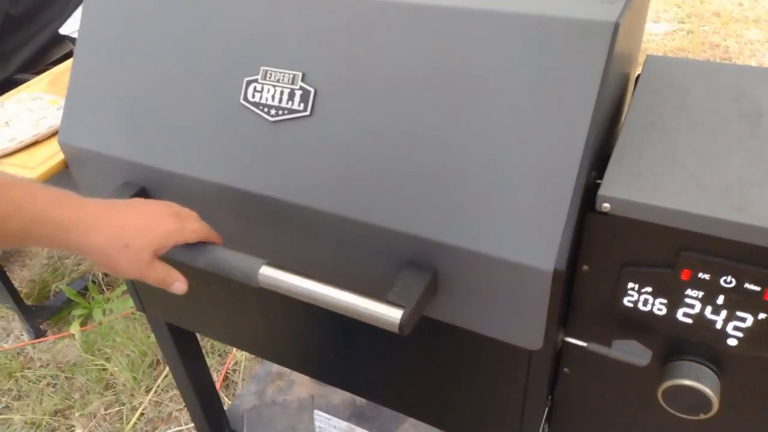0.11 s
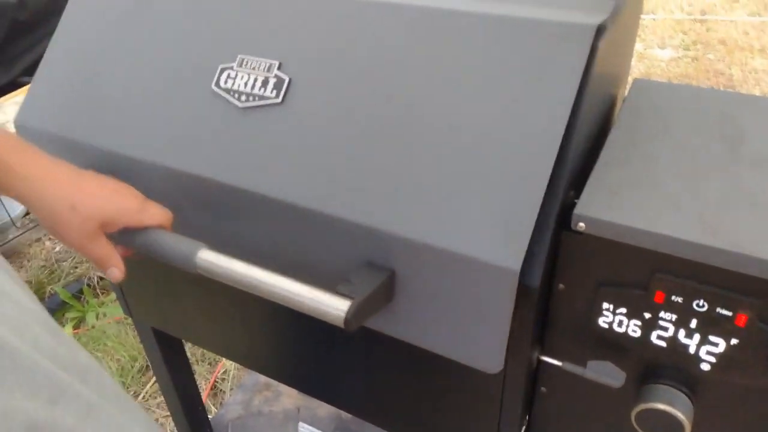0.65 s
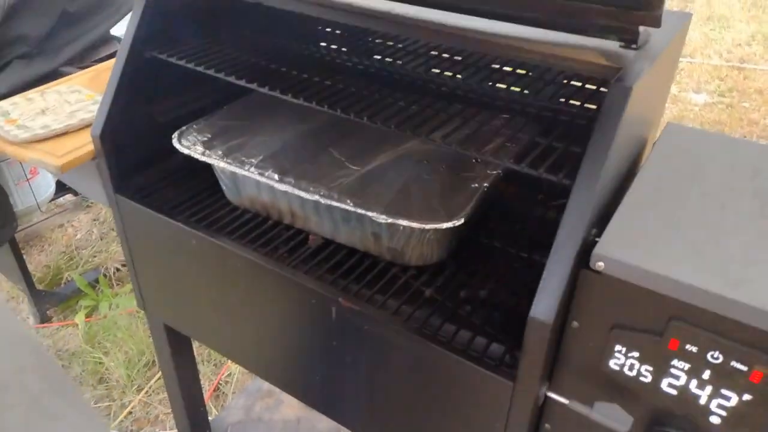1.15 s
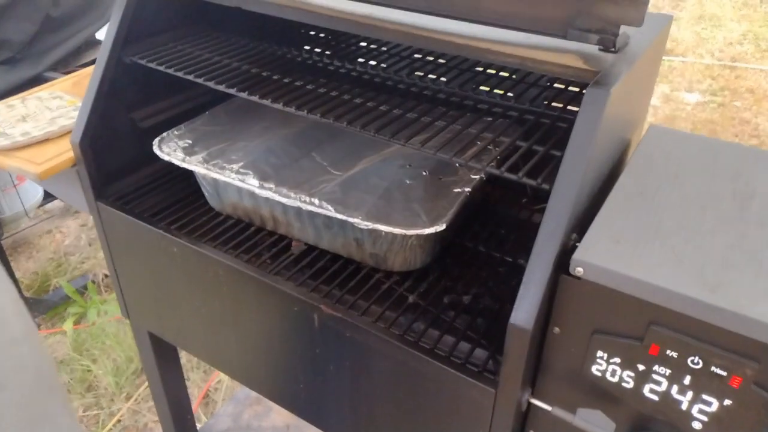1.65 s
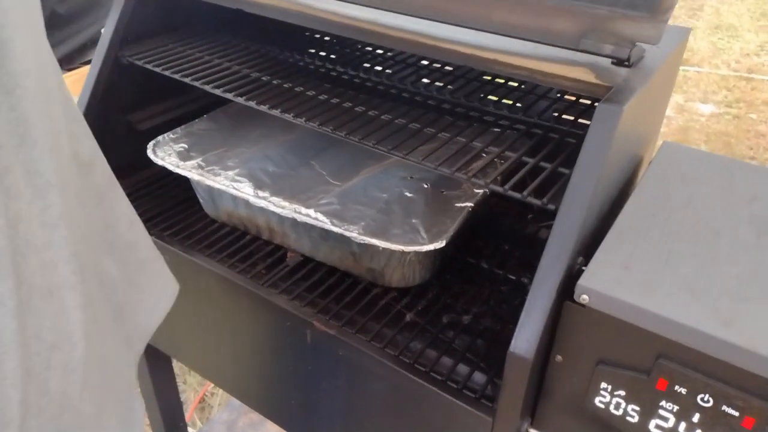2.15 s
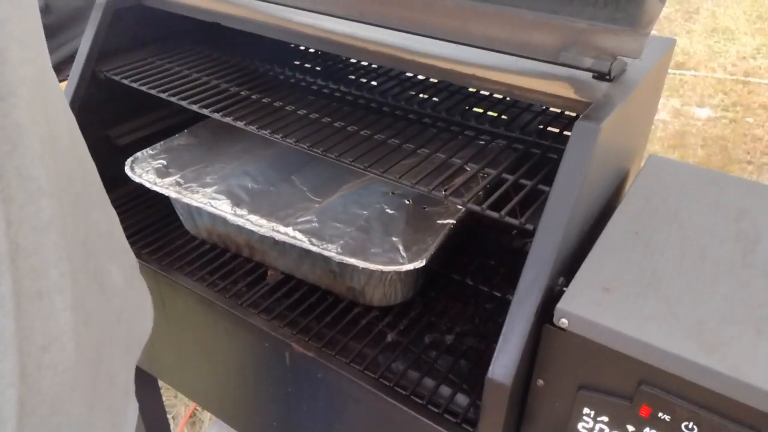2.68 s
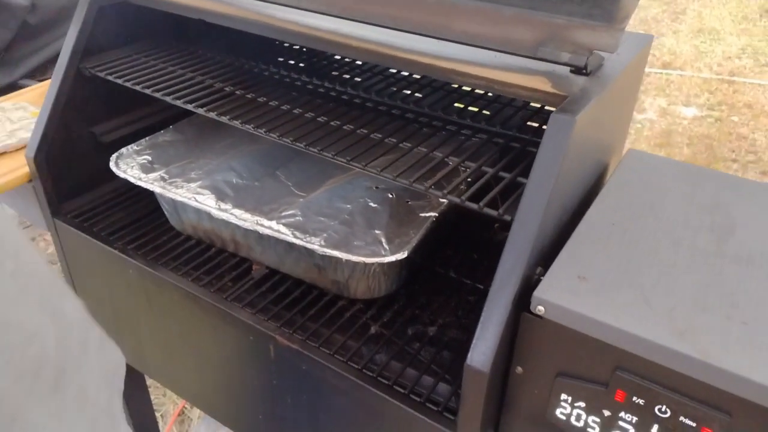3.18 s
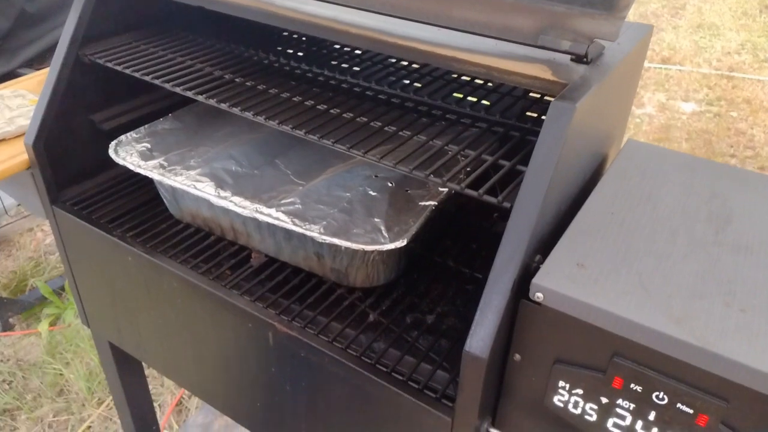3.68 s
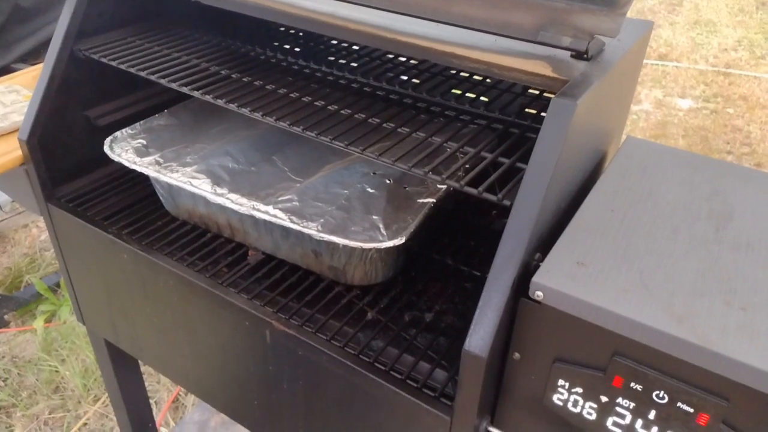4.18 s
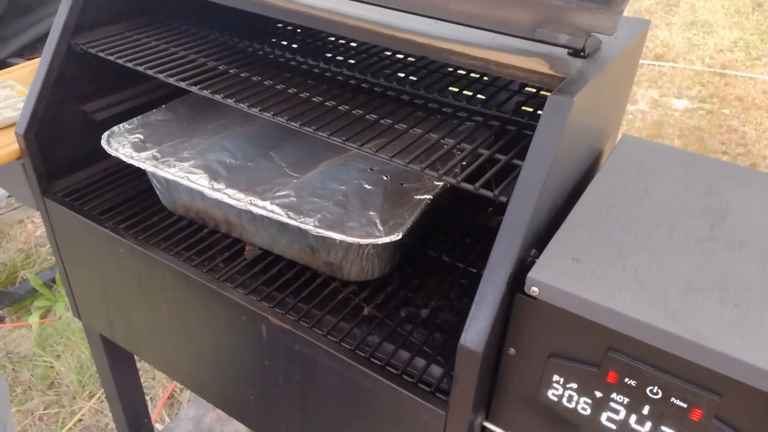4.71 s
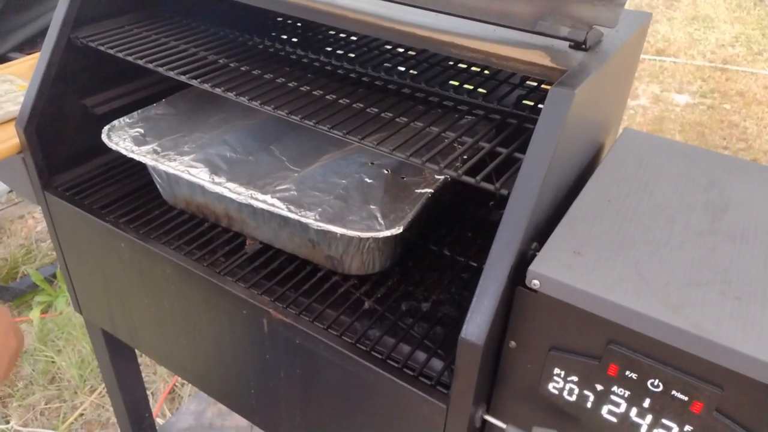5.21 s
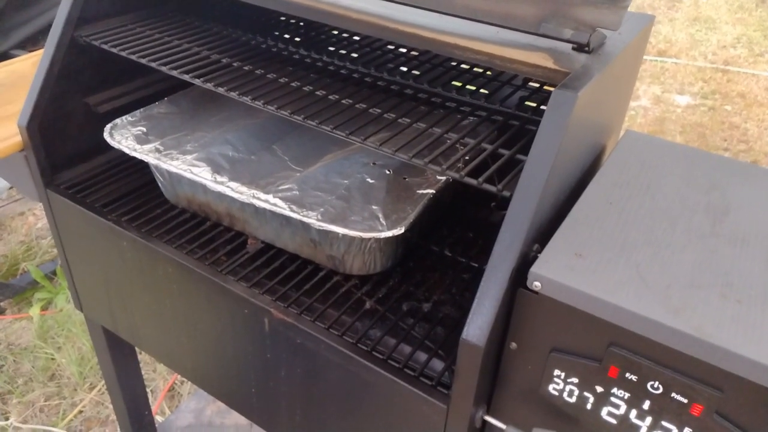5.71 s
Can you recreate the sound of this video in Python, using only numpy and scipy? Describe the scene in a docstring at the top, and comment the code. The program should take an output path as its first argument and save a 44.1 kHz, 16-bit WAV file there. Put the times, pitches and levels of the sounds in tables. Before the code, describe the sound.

Outdoors beside a pellet grill, heard by a close-set stereo pair, with no room echo. From 0 s a soft, hollow blower whir with a slightly wavering blade tone runs over faint hiss and barely audible ember crackle. Around 0.5-0.63 s the lid unsticks in a tight flurry of tiny bright metal ticks. The low fire roar rises in uneven lurches from about 0.6 s, and the whir dips for an instant near 0.8 s. At 1.16-1.3 s the hinge gives a short, rough, warbling groan, two notes about an octave apart. By 1.5-2 s the lid is up: deep fluttering flame roar dominates, with mid-pitched rushing draught, both holding to the end at nearly 6 s. Isolated hot-metal ticks fall near 2.2, 2.5, 4.3 and 5.3 s, with several faint ones around 5.6-5.8 s. A quiet, high, cloth-like rustle comes and goes from 3 to 4.4 s, strongest near 3.9 s.

```python
"""Outdoors at a pellet grill: its blower whirs while a hand lifts the steel lid, which unsticks and groans.
With the lid open the fire's roar and the draught come out of the barrel: noise shaped by resonances.
The whir is noise in a housing plus a blade tone, the groan is two gliding notes, and hot metal ticks in
short rings and snaps. Embers crackle in tiny puffs of noise, over hiss, and something soft rustles near
a pair of close-set microphones."""
import sys
import numpy as np
from scipy import signal
from scipy.fft import rfft, irfft, next_fast_len
from scipy.io import wavfile
from scipy.ndimage import uniform_filter1d, map_coordinates

SR = 44100
rng = np.random.default_rng(int(sys.argv[2]) if len(sys.argv) > 2 else 0)


def master_out(mix):
    """Clip the mix to full scale and print it as 16-bit PCM to the path in sys.argv[1]."""
    frames = np.transpose(np.atleast_2d(mix))
    ceiling = np.clip(frames, -1, 1)
    pcm = np.round(ceiling * 32767).astype(np.int16)
    wavfile.write(sys.argv[1], SR, pcm)


def voltage_ratio(decibels):
    """Convert decibels (scalar or array-like) to amplitude ratios, 20 dB per decade."""
    exponent = np.asarray(decibels, float) / 20
    return 10 ** exponent


N = 257544  # length in samples
TIME = np.arange(N) / SR  # seconds

# The lid's swing: the start and the end of its way up, both in seconds.
LID_SWING = [0.48, 1.44]


def unit(x):
    """Scale a sound to rms 1."""
    return x / np.sqrt(np.mean(x ** 2) + 1e-20)


def along(points, hz):
    """Read (Hz, value) points on a log frequency axis."""
    f, v = np.transpose(points)
    return np.interp(np.log(hz + 1), np.log(f + 1), v)


def curves(rows):
    """Turn each column after the time into one value per sample."""
    s, *columns = np.transpose(rows)
    return [np.interp(TIME, s, column) for column in columns]


def wobble(rate):
    """A smooth random curve through `rate` random points a second."""
    points = rng.standard_normal(int(N * rate / SR) + 4)
    return map_coordinates(points, [np.arange(N) * rate / SR])


def filtered(x, response):
    """Multiply the spectrum of x by a response that depends on frequency."""
    m = next_fast_len(N + 8192)
    return irfft(rfft(x, m) * response(np.fft.rfftfreq(m, 1 / SR)), m)[..., :N]


def resonant(modes):
    """The gain of steep resonances whose powers add."""
    def gain(hz):
        return np.sqrt(sum(voltage_ratio(2 * db) / (1 + (2 * (hz - centre) / width) ** 2) ** 2
                           for centre, width, db in modes))
    return gain


def spread(common, own):
    """Two microphones hear a common part, which arrives late on the left, and a part that differs."""
    # Share of sound the microphones have in common. Each row: frequency in Hz, likeness from 0 to 1.
    alike = [(60, 0.97), (140, 1), (330, 0.98), (500, 0.86), (800, 0.77), (1200, 0.54), (1800, 0.6),
             (2700, 0.1), (4200, 0.31), (6000, 0.09), (16000, .3)]
    # Balance of the pair. Each row: frequency in Hz, left minus right in dB.
    lean = [(60, -0.5), (130, 0.5), (290, 0), (640, 0), (1410, 1), (3100, 1), (6820, 4.5), (15000, -5)]
    lag_ms = 0.087  # left behind right

    def paths(hz):
        turn = np.arccos(np.clip(along(alike, hz), 0, 1)) / 2
        # each side takes half of the balance and half of the lag
        tilt = voltage_ratio(along(lean, hz) / 2) * np.exp(-1j * np.pi * hz * lag_ms / 1000)
        left = [np.cos(turn) * tilt, np.sin(turn) * tilt]
        right = [np.cos(turn) / tilt, -np.sin(turn) / tilt]
        return np.array([left, right])
    return filtered(np.array([common, own]), paths).sum(axis=1)


def rush(gain, patchy_db):
    """Coloured stereo noise of rms 1, with random patches in time and pitch that are louder or softer."""
    z = signal.stft(rng.standard_normal((2, N)), nperseg=512)[2]
    patches = uniform_filter1d(rng.standard_normal(z.shape[1:]), size=5, axis=0)
    patches = uniform_filter1d(patches, size=10, axis=1)
    pair = signal.istft(z * voltage_ratio(patchy_db * unit(patches)), nperseg=512)[1][:, :N]
    return unit(spread(*filtered(pair, gain)))


def opened():
    """How far the lid is up, from 0 to 1."""
    return np.interp(TIME, LID_SWING, [0, 1])


def flame():
    """A turbulent, fluttering flame rings the low air resonances of the barrel."""
    # Roar out of the barrel. Each row: time in seconds, level in dB.
    roar_level = [(0, -56), (.37, -66.5), (.6, -59.5), (.72, -46), (.78, -56.5), (.84, -50.5), (.93, -46.5),
                  (1.05, -44.5), (1.13, -41), (1.3, -39), (1.5, -38.5), (1.95, -35.5), (2.6, -36.5),
                  (3.25, -37.5), (3.4, -33.5), (3.6, -35.5), (4.2, -35.5), (5.0, -36.5), (5.5, -37.5),
                  (5.84, -35.5)]
    # Air resonances of the barrel. Each row: frequency in Hz, width in Hz, level in dB.
    barrel = [(62, 30, -50), (115, 17, -10), (152.1, 31.6, 1), (186.4, 24, -1), (227.4, 71, -3),
              (284, 81.6, -7), (343, 8.1, -17.5), (409, 63, -16)]
    # Changing colour. Each row: time in seconds, upper over lower half in dB, top resonance in dB.
    roar_colour = [(.4, -3, 1), (1.2, 6, -5), (2.0, 2.5, -4), (2.9, -2, 2.5), (3.6, 2, 1), (4.4, -3.5, 2.5),
                   (5.84, -3, 0)]
    roar_db, = curves(roar_level)
    tilt_db, top_db = curves(roar_colour)
    roar = rush(resonant(barrel), patchy_db=0.4)
    low = filtered(roar, lambda hz: 1 / (1 + (hz / 210) ** 4))
    top = filtered(roar, lambda hz: 1 / (1 + (350 / (hz + 1)) ** 16))
    middle = roar - low - top
    roar = voltage_ratio(-tilt_db / 2) * low + voltage_ratio(tilt_db / 2) * middle + voltage_ratio(top_db) * top
    return voltage_ratio(roar_db + 0.73 * wobble(9)) * roar


def draught():
    """Rushing air rings the higher barrel resonances and gets louder as the lid goes up."""
    # Resonances of the barrel. Each row: frequency in Hz, width in Hz, level in dB.
    barrel = [(890, 56, -14), (959, 18, -3), (1006.6, 93, 1.5), (1097, 62, -2), (1153, 87, -3.5),
              (1233, 116, 2), (1303, 39, -3), (1347, 52, -5), (1440, 78, -8), (1505, 59, -7),
              (1643, 110, -12.5), (1803, 98, -8), (1873, 110, -13), (2013, 200, -14), (2130, 43, -15),
              (2266, 110, -15.5), (2507, 215, -17), (2760, 200, -19.5), (3054, 235, -22),
              (3354, 110, -22.5)]
    shut_db, open_db, growth_db_per_s = -65, -51.5, 1
    level_db = shut_db + (open_db - shut_db) * opened() ** 0.79
    level_db = level_db + growth_db_per_s * np.minimum(TIME, 4.2)  # grows slowly, then levels off
    gusts_db = 0.7 * wobble(7) + 0.93 * wobble(25)
    return voltage_ratio(level_db + gusts_db) * rush(resonant(barrel), patchy_db=1.15)


def blower():
    """Air noise rings the blower housing, with a slightly unsteady tone from the blades."""
    # Resonances of the housing. Each row: frequency in Hz, width in Hz, level in dB.
    housing = [(61.6, 29, -11.5), (109.8, 25.3, 5), (166, 110, -12), (260, 77, -4.5), (383, 330, -10),
               (599.4, 101, 0), (690, 95, -3.5), (851.5, 48, -8), (913, 110, -11), (1226, 190, -8),
               (1477, 92, -14), (1920, 420, -20), (2370, 1260, -22), (3040, 410, -26.5)]
    # Change of the whir between 650 and 950 Hz. Each row: time in seconds, level in dB.
    band_level = [(0, 2.5), (1.8, 2), (3.2, -2.5), (4.5, 0)]
    whir = rush(resonant(housing), patchy_db=1.03)
    band = filtered(whir, lambda hz: (hz > 650) & (hz < 950))
    band_db, = curves(band_level)
    whir = whir + (voltage_ratio(band_db) - 1) * band

    blade_hz = 475 + 1.68 * wobble(5)
    tone_db = -22.0 + 2.6 * opened() + 4.9 * wobble(5)  # against the whir
    tone = voltage_ratio(tone_db) * np.sin(2 * np.pi * np.cumsum(blade_hz) / SR)

    # the whir dims a little early on and returns as the lid lifts
    dim_s, dim_db = 0.16, 2
    dimming_db = np.interp(TIME, [dim_s - 0.04, dim_s + 0.035, *LID_SWING], [0, dim_db, dim_db, 0])
    # it dips briefly as the lid clears the rim
    dip_s, dip_db = 0.798, 5.5
    dipping_db = dip_db * np.exp(-((TIME - dip_s) / 0.025) ** 2)
    waver_db = 0.65 * wobble(2.8)
    return voltage_ratio(-50 - dimming_db - dipping_db + waver_db) * (whir + tone)


def hinge():
    """The hinge groans unevenly: a low note and one about an octave up, both slightly rough."""
    # The groan while the lid is still on its way up. Each row: time in seconds, low note in Hz,
    # its level in dB, upper note in Hz, its level in dB.
    groan_notes = [(1.161, 690, -64, 1428, -75), (1.166, 715, -47, 1430, -64), (1.176, 710, -43, 1466, -57),
                   (1.182, 706, -35, 1485, -58), (1.188, 707, -56, 1505, -56), (1.205, 762, -51, 1550, -55),
                   (1.216, 765, -57, 1557, -73), (1.234, 748, -49, 1486, -68), (1.25, 699, -54, 1480, -61),
                   (1.285, 720, -67, 1510, -66)]
    first, last = groan_notes[0], groan_notes[-1]
    fade_in = (first[0] - 0.01, first[1], -120, first[3], -120)
    fade_out = (last[0] + 0.01, last[1], -120, last[3], -120)
    low_hz, low_db, upper_hz, upper_db = curves([fade_in, *groan_notes, fade_out])
    phase_step = 2 * np.pi * (1 + 0.0091 * wobble(140)) / SR  # both pitches shake together
    low = voltage_ratio(low_db) * np.sin(np.cumsum(low_hz * phase_step))
    upper = voltage_ratio(upper_db + 1.5 * wobble(150)) * np.sin(np.cumsum(upper_hz * phase_step))
    groan = np.sqrt(2) * (low + upper)
    late = np.roll(groan, round(0.00045 * SR))
    return spread(groan, 1.6 * late)


def ticks():
    """Hot steel ticks: a mode and four weaker neighbours ring over a broad dying snap with a bright edge."""
    # Ticks of the steel. Each row: start in seconds, ring level in dB, pitch in Hz,
    # time for the ring to fall 60 dB in seconds, snap level in dB.
    tick_rows = [(0.525, -56, 7400, .004, -61), (0.525, -60, 9000, .004, -70), (.5270, -73, 5460, .02, -63),
                 (0.53, -71, 2280, .05, -66), (.539, -74, 5700, .03, -63), (.548, -67, 2260, .04, -74),
                 (.5758, -59, 2130, .03, -80), (0.576, -64, 3120, .03, -79), (.5805, -64, 2200, .025, -67),
                 (.584, -61, 2830, .02, -78), (0.59, -66, 2320, .02, -67), (.5945, -67, 2600, .02, -72),
                 (.600, -68, 2600, .02, -74), (.628, -73, 6900, .02, -69), (0.776, -74, 6000, .02, -69),
                 (2.174, -59, 2220, 0.035, -76), (2.219, -61, 4050, 0.015, -61.5),
                 (2.2205, -58, 3650, 0.027, -68), (2.227, -69, 3400, .04, -77),
                 (2.326, -71, 5000, .02, -72), (2.49, -58, 2100, .05, -76), (2.9568, -73, 4500, .02, -73),
                 (3.011, -75, 5000, .02, -69), (4.105, -72, 5000, .03, -71), (4.285, -65, 3600, .03, -74),
                 (5.335, -60, 2100, .03, -71), (5.553, -67, 4300, .025, -75), (5.709, -76, 6000, .015, -76),
                 (5.7196, -68, 4300, .02, -74), (5.742, -76, 7000, .03, -74), (5.806, -72, 6500, .02, -67)]
    pitch_spread, left_over_right_db = 0.09, 3
    snap_t60_s, snap_hz, snap_db_per_oct = 0.082, 2500, -10.5  # decay, lower edge, slope
    edge_db, edge_t60_s, edge_hz = -6, 0.035, 6300  # level over the snap, decay, lower edge
    out = np.zeros((2, N + SR))
    t = np.arange(SR // 8) / SR
    grid = np.fft.rfftfreq(len(t), 1 / SR) + 1
    snap_gain = voltage_ratio(snap_db_per_oct * np.log2(grid / snap_hz)) / np.sqrt(1 + (snap_hz / grid) ** 8)
    edge_gain = 1 / np.sqrt(1 + (edge_hz / grid) ** 4)
    sides = voltage_ratio([[left_over_right_db / 2], [-left_over_right_db / 2]])
    for start_s, ring_db, hz, t60_s, snap_db in tick_rows:
        near_hz = hz * (1 + pitch_spread * rng.standard_normal((2, 4, 1)))
        neighbours = np.sin(2 * np.pi * near_hz * t).sum(axis=1)
        ring = np.sqrt(2) * (np.sin(2 * np.pi * hz * t) + 0.78 * neighbours)
        common, own = rng.standard_normal((2, len(t)))
        snap = unit(irfft(rfft(common + np.outer([0.8, -0.8], own)) * snap_gain, len(t)))
        edge = unit(irfft(rfft(common + np.outer([0.5, -0.5], own)) * edge_gain, len(t)))
        noise = voltage_ratio(-60 * t / snap_t60_s) * snap + voltage_ratio(edge_db - 60 * t / edge_t60_s) * edge
        burst = voltage_ratio(ring_db - 60 * t / t60_s) * ring + voltage_ratio(snap_db) * noise
        burst = burst * (1 - np.exp(-t / 0.00056))  # quick, soft start
        out[:, round(start_s * SR):][:, :len(t)] += burst * sides
    return out[:, :N]


def embers():
    """Embers spit sparks at random moments, each a few milliseconds of noise."""
    sparks = (rng.random(N) < 170 / SR) * voltage_ratio(rng.normal(0, 1.8, N))  # about 170 a second
    puffs = np.convolve(sparks, voltage_ratio(-60 * np.arange(SR // 20) / SR / 0.018))[:N]
    puffs = puffs ** 0.65  # keeps sparks that fall together from standing out, and lengthens the decay
    noise = puffs * rng.standard_normal((2, N))
    colour = lambda hz: np.exp(-(np.log(hz / 4200 + 1e-9) / 0.7) ** 2)
    crackle = unit(spread(*filtered(noise, colour)))
    lid_db = 2.6 * (opened() - 1.5)  # the shut lid muffles the embers
    return voltage_ratio(-74 + lid_db) * crackle


def rustle():
    """Something soft rubs midway between the microphones: patchy noise that swells and trails off."""
    # Swells of the rustle. Each row: time in seconds, level in dB.
    swells = [(2.99, -92), (3.05, -79), (3.2, -78), (3.26, -89), (3.57, -89), (3.62, -74), (3.8, -71.5),
              (3.85, -69.5), (3.92, -69.5), (3.97, -75.5), (4.2, -79), (4.27, -76.5), (4.42, -89)]
    # Colour of the rustle. Each row: frequency in Hz, level in dB per Hz.
    cloth = [(2000, -46), (4000, 5.5), (7000, -1), (9000, 1.5), (11500, -5), (13500, -2), (15000, 2),
             (17000, -2.5)]
    fade_in, fade_out = (swells[0][0] - 0.05, -120), (swells[-1][0] + 0.05, -120)
    level_db, = curves([fade_in, *swells, fade_out])
    pair = rush(lambda hz: voltage_ratio(along(cloth, hz)), patchy_db=0.4)
    rub = unit(pair.mean(axis=0))
    return voltage_ratio(level_db + 0.8 * wobble(40)) * rub


def hiss():
    """Open-air hiss: steady, slightly patchy noise with faint resonances."""
    # Colour of the hiss. Each row: frequency in Hz, level in dB per Hz.
    air_colour = [(1940, -19), (3300, -11), (3570, -7.5), (3880, -8.5), (4200, -9), (5730, -15),
                  (7390, -14), (8300, -17.5), (10500, -20), (15100, -20.5), (15600, -15.5)]
    # Faint resonances in it. Each row: frequency in Hz, width in Hz, gain in dB.
    whistles = [(3920, 110, 6), (4720, 80, 4.5), (6350, 250, 4.5), (7470, 160, 2.5), (8500, 150, 5.5),
                (9200, 120, 1.5), (15700, 250, 3)]

    def gain(hz):
        peaks_db = sum(db / (1 + (2 * (hz - centre) / width) ** 2) for centre, width, db in whistles)
        return voltage_ratio(along(air_colour, hz) + peaks_db)
    return voltage_ratio(-70.5) * rush(gain, patchy_db=0.6)


def scene():
    """All sources at the two microphones; all but the ticks and groan drift slowly left, then stay."""
    left_over_right_db = -0.4 + 0.14 * np.minimum(TIME, 4)
    sides = voltage_ratio([left_over_right_db / 2, -left_over_right_db / 2])
    drifting = flame() + draught() + blower() + embers() + rustle() + hiss()
    return drifting * sides + hinge() + ticks()


def low_pass(x):
    """Removes everything above the highest recorded frequency."""
    return signal.sosfilt(signal.butter(12, 16430, fs=SR, output="sos"), x)


def record(dry):
    """Deep bass and extreme treble are lost, and the treble's stereo width drops out where it is quiet."""
    mono_hz, top_hz = 6250, 15750  # stereo width can drop out from mono_hz up
    mid, side = (dry[0] + dry[1]) / 2, (dry[0] - dry[1]) / 2
    hz, _, z = signal.stft(side, SR, nperseg=1024)
    hz = hz[:, None]
    level_db = 10 * np.log10(uniform_filter1d(np.abs(z) ** 2, size=14, axis=0) + 1e-20)
    # width stays where it exceeds its usual level by a margin that rises with frequency
    usual_db = np.median(level_db, axis=1, keepdims=True)
    needed_db = usual_db + 3.0 + 0.99 * (hz - mono_hz) / 1000
    kept = (hz < mono_hz) | (level_db > needed_db)
    side = signal.istft(z * kept, SR, nperseg=1024)[1][:N]
    band = lambda hz: (hz < top_hz) / np.sqrt(1 + (56 / (hz + 1)) ** 8)
    mix = filtered(np.array([mid + side, mid - side]), band)
    return low_pass(mix)


dry = scene()
out = record(dry)
master_out(out)
```